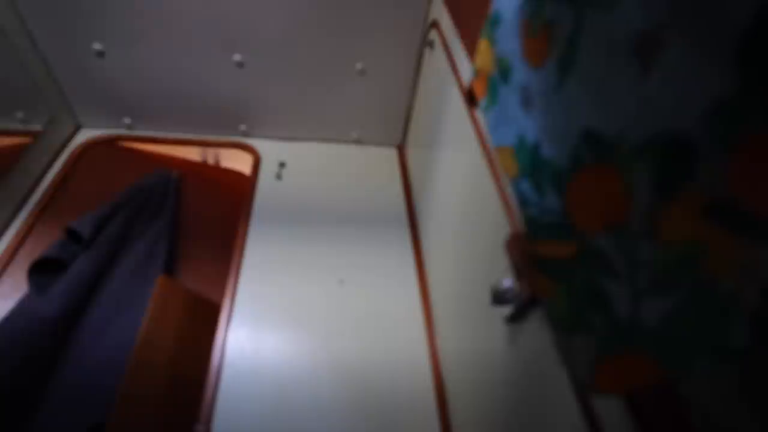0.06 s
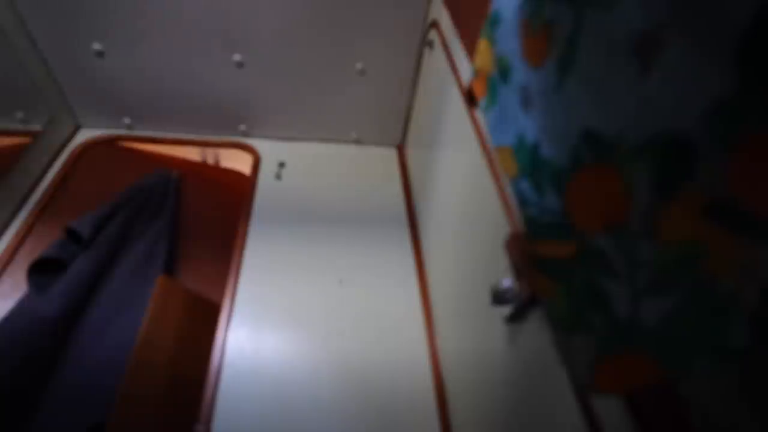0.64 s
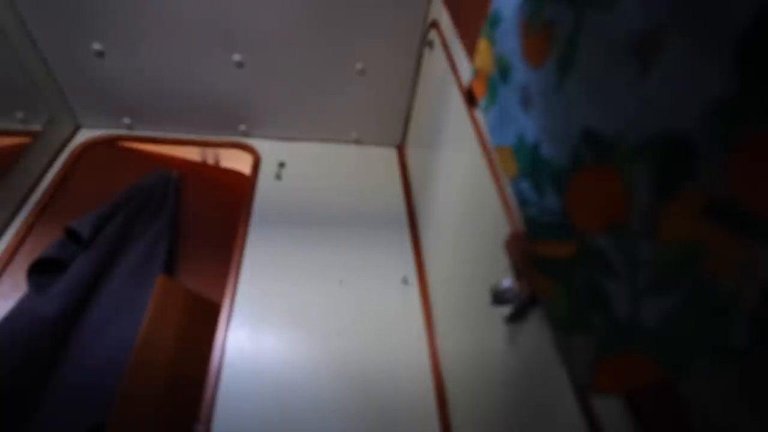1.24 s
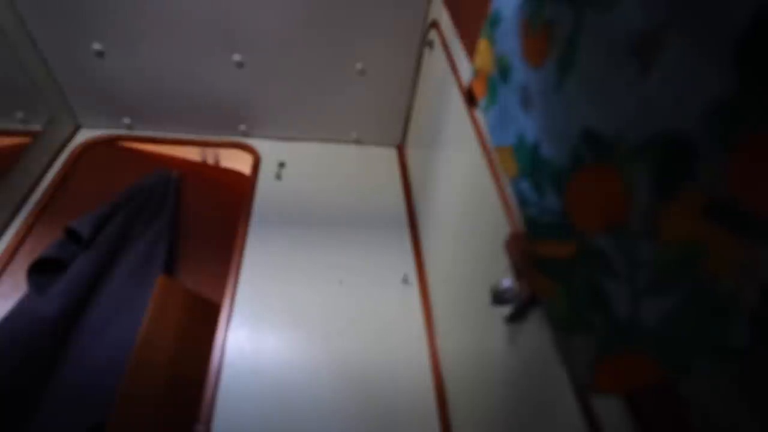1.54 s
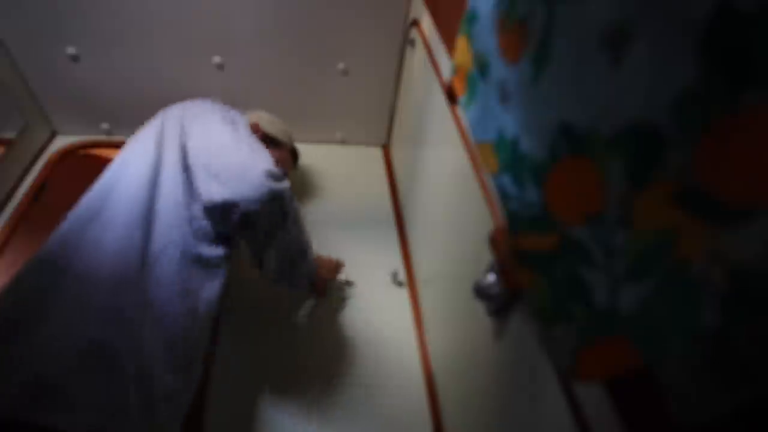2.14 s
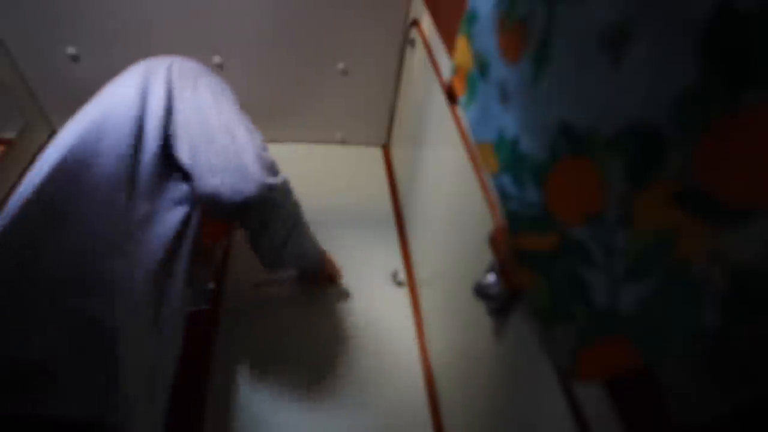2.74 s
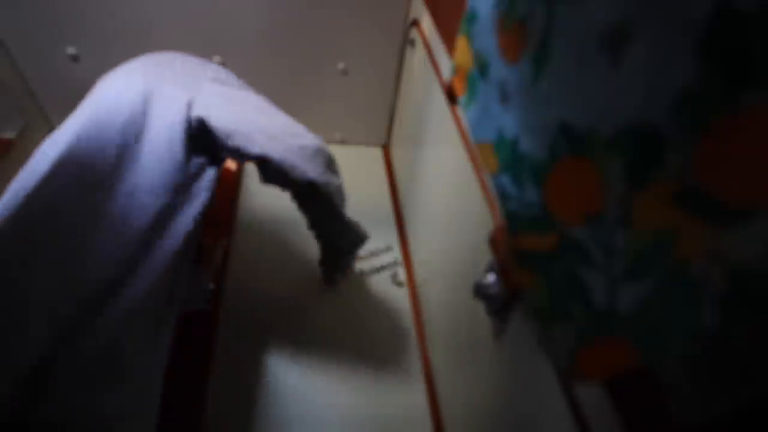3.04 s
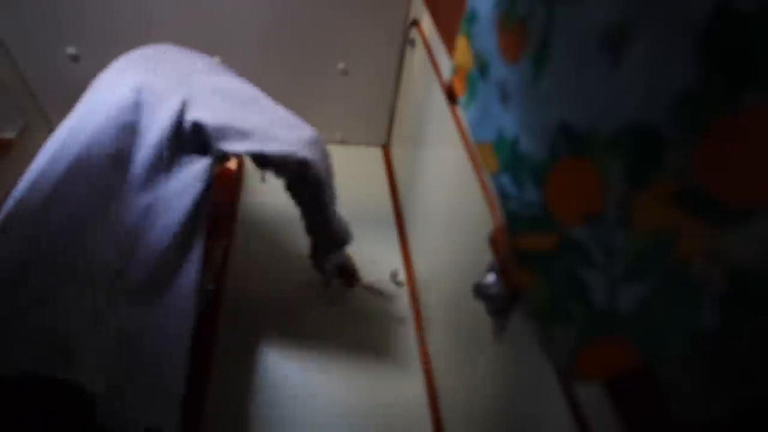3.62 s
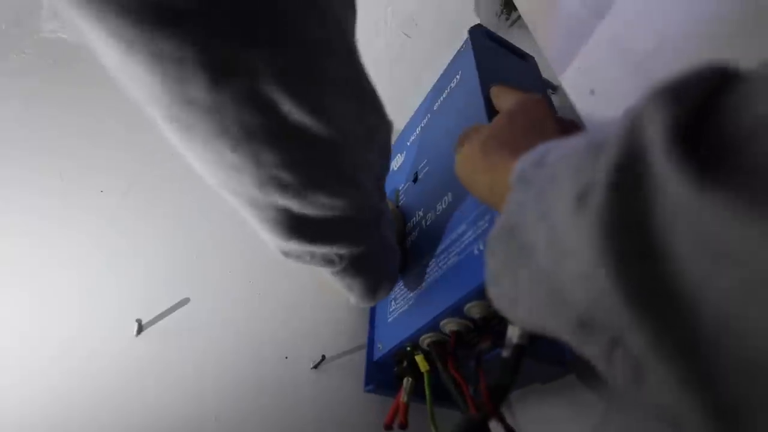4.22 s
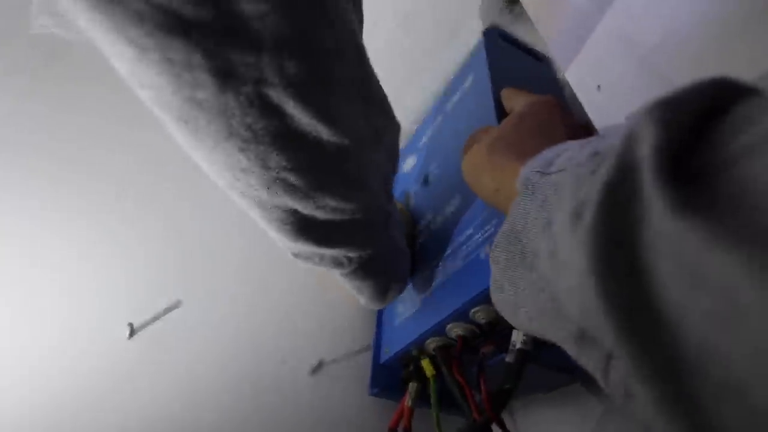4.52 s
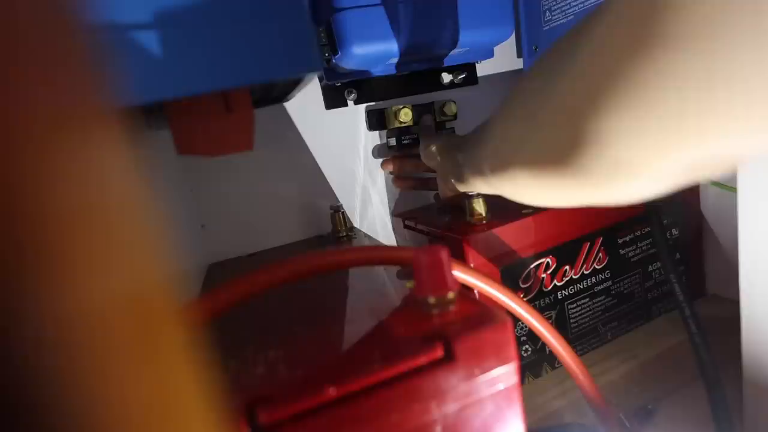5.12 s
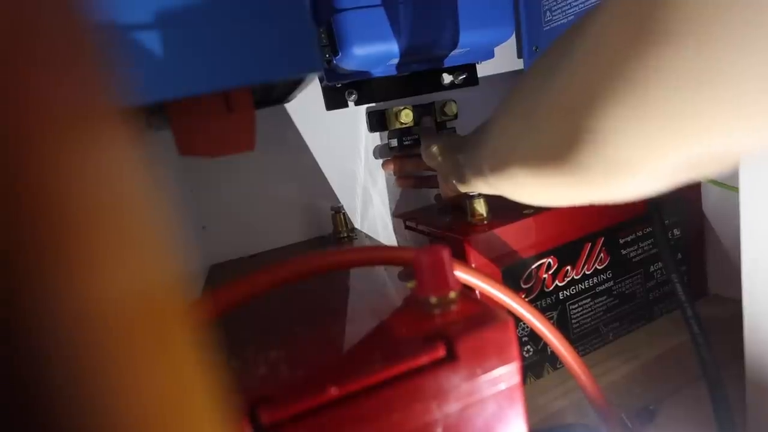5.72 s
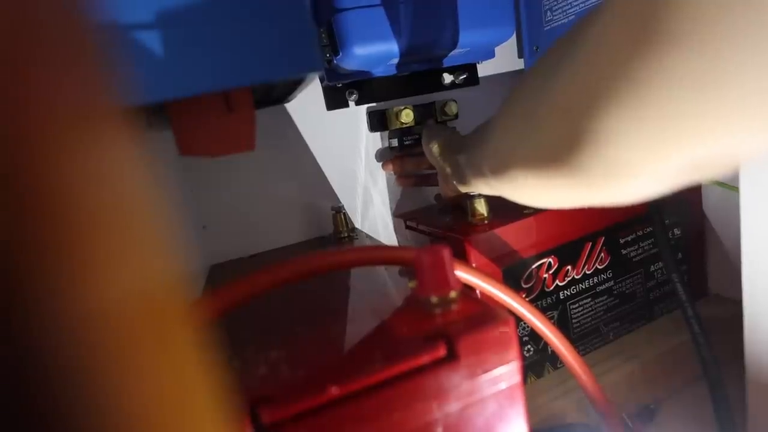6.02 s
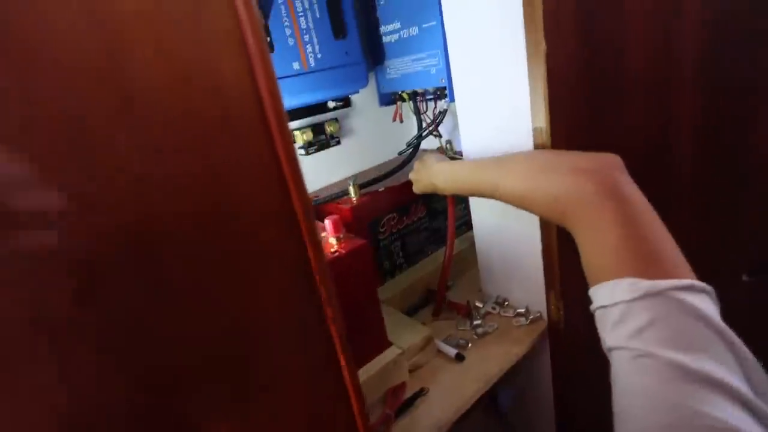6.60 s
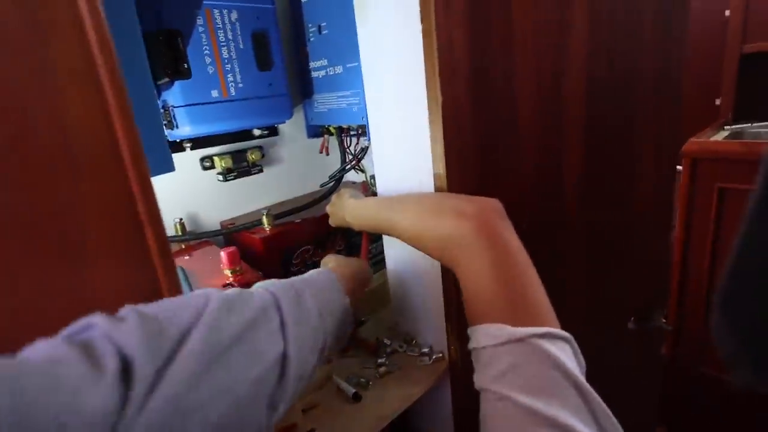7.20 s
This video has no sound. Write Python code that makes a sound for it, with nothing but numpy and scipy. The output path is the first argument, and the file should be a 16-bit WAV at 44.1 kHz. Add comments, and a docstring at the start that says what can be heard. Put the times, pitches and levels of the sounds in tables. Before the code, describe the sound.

Close to the microphone in a cramped wooden boat cupboard, a drill bores into a panel, crackling as it catches and whining higher afterwards. After an abrupt stop come sharp knocks on the wall and three short scrapes of bolt threads. Next a metal case clunks into place with low booms and tiny pings, then hands thump dully on wood while a spanner ticks faintly. Cloth rustle and low rumble underlie the handling.

```python
"""Fitting a battery charger in a boat's plywood cupboard, in four short scenes joined by hard cuts.
First a cordless drill whines and tears chips from the wall. From 2 s a bolt rasps in and out of the
hole, its threads catching on the wood, between knocks that make the wall ring. From 4 s the metal case
is bumped into place and washers ping. Last, from about 5 s, hands thump the battery locker and fumble
with cables while a spanner ticks. Once the drill stops, sleeves rustle and wood rumbles under it all."""
import sys
import numpy as np
from scipy.fft import rfft, irfft, next_fast_len
from scipy.io import wavfile
from scipy.ndimage import map_coordinates

SR = 44100
rng = np.random.default_rng(int(sys.argv[2]) if len(sys.argv) > 2 else 0)


def unload_wav(signal):
    """Save mono or channel-first audio to the path in sys.argv[1] as 16-bit WAV at rate SR, clipped to [-1, 1]."""
    wavfile.write(
        sys.argv[1],
        SR,
        np.round(np.clip(np.atleast_2d(signal).T, -1, 1) * 32767).astype(np.int16),
    )


N = 324135
TIME = np.arange(N) / SR
AGE = TIME[:SR // 2]  # seconds since a blow began
DRILL_END, CASE_START, LOCKER_START = 1.974, 3.98, 5.152  # the cuts, in seconds
BIND_START, BIND_END = 0.5, 0.786  # the drill bit jams between these seconds

# Noise shapes: how strong a noise is from low to high. Each row: frequency in Hz, level in dB.
SHUDDER = [(25, -22), (50, -26), (80, -21), (125, -3), (190, -3), (300, 4), (430, -1), (650, -35),
           (1200, -52)]  # the wall shaking
THUD = [(150, 6), (230, 17.5), (400, 13.5), (560, 4), (750, -22.5)]  # the low part of a blow
CLACK = [(330, 3.5), (600, 7.5), (1200, 1), (2000, -9), (3200, -24), (6000, -50)]  # its middle part
TICK = [(1900, 6), (3200, 0.5), (5000, -3.5), (8000, -9), (11000, -20), (15700, -29)]  # its high part
GRIT = [(4000, -12), (6800, -6.5), (8500, -12.5), (10000, -16), (13000, -11.5), (15700, -40)]  # scraped steel
RUBBING = [(150, -1), (280, 1.5), (420, -0.5), (580, -1), (850, -8.5), (1300, -8.5), (2200, -22)]  # hands on wood


def drill():
    """The bit tears off tiny chips that shake the wall; the harder the push, the louder it gets."""
    # How hard the drill is pushed. Each row: time in seconds, push in dB.
    push = [(0, -5), (0.33, -1), (0.42, -3.5), (0.53, 2), (0.61, 8), (0.72, 11), (0.81, -6.5), (0.89, -3.5),
            (0.98, -8.5), (1.085, 4.5), (1.165, -8.5), (1.26, 2), (1.37, -4.5), (1.62, 0.5), (1.72, 3.5),
            (1.97, 2)]
    # Notes of the wall and its hard surface. Each row: pitch in Hz, width in Hz, level in dB.
    wall_notes = [(458.4, 5.4, 4), (531, 29, -5), (585.7, 10.8, 1), (635, 13, -5.5), (691, 5.7, 2),
                  (738, 8.7, -15), (835, 9.6, -4.5), (960, 7.3, -6.5), (1029.5, 10.5, -3.5),
                  (1150, 7.8, -3), (1277, 40, -18), (1354, 22, -6)]
    surface_notes = [(1686, 10.5, 6), (1998, 91, 1), (2236, 5.1, 8.5), (2597, 140, 0), (3018, 10, 4)]
    # Low, middle and high noise of the cut. Each row: frequency in Hz, level in dB.
    grinding_shape = [(330, -17), (460, -10), (650, -5.5), (1000, -5.5), (1450, -13.5), (1900, -31.5)]
    cutting_shape = [(1100, -17), (1520, 1), (1900, -5), (2350, -4.5), (2600, -3.5), (3400, -4.5),
                     (4400, -40)]
    hiss_shape = [(1800, -41), (3300, 0), (4500, 1.5), (6000, -2.5), (7500, -9), (8700, -10),
                  (10500, -19.5), (12500, -17.5), (15700, -23)]
    push_db = curves(push)[0] + 2.4 * wobble(22.14)
    jam_db = 4 * gate(BIND_START, BIND_END, 0.012)
    chips, dust = grains(rate=11000, spread_db=0), grains(rate=12000, spread_db=1)
    shudder = coloured(grains(rate=4000, spread_db=-0.5), SHUDDER)
    grinding = 0.73 * resonated(chips, wall_notes) + 0.5 * coloured(dust, grinding_shape)
    cutting = 0.61 * resonated(chips, surface_notes) + 0.62 * coloured(dust, cutting_shape)
    out = amp(-27 + 0.55 * push_db) * shudder
    out += amp(-23 + 0.94 * push_db) * grinding
    out += amp(-29 + 0.54 * push_db + jam_db) * cutting
    out += amp(-30.5 + 0.4 * push_db) * coloured(chips, hiss_shape)
    return (out + splinters() + motor_whine()) * gate(-1, DRILL_END, 0.003)


def splinters():
    """The bit snags and tears out a splinter, sending a crack through the wall."""
    # Each row: start in seconds, level in dB.
    snags = [(.496, -20), (.522, -21.5), (.588, -21), (.675, -15), (0.719, -35), (.738, -23)]
    out = np.zeros(N)
    for start, db in snags:
        body = 0.33 * boom(hz=163, t60=0.13, rise=0.004)
        add(out, start, amp(db) * (body + burst(CLACK, t60=0.1) + 0.52 * burst(TICK, t60=0.11)))
    return out


def motor_whine():
    """Motor and gears sing at multiples of the motor's speed, drop out in the jam and return higher."""
    # The motor speeds up past the hard spot. Each row: time in seconds, turns per second.
    speeds = [(0, 286.2), (.5, 291), (.86, 334.5), (1.05, 338.6), (1.42, 339.5), (1.6, 338.9),
              (1.97, 338.7)]
    # Each list has one entry per tone: speed multiple, dB when slow, dB when fast (before the swell).
    multiples = [1, 2, 2.52, 4, 6.8, 15, 16.7, 25, 30, 40]
    slow_levels = [-29.5, -30, -60, -44, -44, -43.5, -41.5, -45.5, -49, -55]
    fast_levels = [-29, -30, -35, -39, -52, -32, -49, -46, -56, -68]
    speed, = curves(speeds)
    turns = np.cumsum(speed * (1 + 0.0003 * wobble(20))) / SR
    swell_db = 7 * (np.minimum(TIME, DRILL_END) - 2.13)  # 7 dB a second as the bit sinks in
    slow = gate(-1, BIND_START, 0.047)
    fast = gate(0.88, DRILL_END + 1, 0.055) * amp(swell_db)
    out = np.zeros(N)
    for multiple, slow_db, fast_db in zip(multiples, slow_levels, fast_levels):
        waver = amp(1.6 * wobble(28))
        tone = np.sqrt(2) * np.sin(2 * np.pi * multiple * turns)
        out += (amp(slow_db) * slow + amp(fast_db) * fast) * waver * tone
    return out


def bolt():
    """Threads catch on the hole's edge and ring wood and steel; the wood grows louder as they grip."""
    # Notes of the wood, the hole's edge and the bolt. Each row: pitch in Hz, width in Hz, level in dB.
    wood_notes = [(185, 9.3, -10.5), (362, 31, -9), (455, 21, -2), (564.5, 21, 6), (745, 52, 4),
                  (860, 110, -36), (1082, 64, 1), (1164, 15, 10), (1260, 16, -13), (1440, 28, -39)]
    edge_notes = [(1655, 60, -3), (1968, 36, 1), (2475, 40, -6), (2815, 65, 0), (3250, 35, -7),
                  (3545, 45, -9), (3890, 110, -11), (4180, 55, -6), (4880, 140, -11), (5870, 35, -15),
                  (6380, 45, -16)]
    steel_notes = [(4135, 34, 2.5), (7700, 510, -9), (8400, 280, 5), (8450, 154, 3.5), (13520, 170, -7)]
    # Noise of the threads. Each row: frequency in Hz, level in dB.
    rasp_shape = [(300, -16), (700, 8), (1400, 3.5), (2200, -5), (2900, -0.5), (3400, -6.5), (4500, 0.5),
                  (6500, -39), (8000, -40)]
    # Each row: start and length in seconds, wood and steel levels in dB, seconds until the threads grip.
    strokes = [(2.145, 0.2, -20.5, -27.5, 0.14), (2.826, 0.26, -22, -26, 0.014),
               (3.531, 0.21, -16, -22.5, 0.12)]
    attack_s, release_db_per_s = 0.01, 510
    catches = grains(rate=10000, spread_db=4.5) * amp(1.2 * wobble(120))
    # The touching point moves, so each note of the wood swells and fades on its own.
    wood = unit(sum(amp(db + 4.2 * wobble(14)) * np.sqrt(width) * resonated(catches, [(hz, width, 0)])
                    for hz, width, db in wood_notes))
    rasp = 0.63 * resonated(catches, edge_notes)
    rasp += 0.75 * coloured(grains(rate=9200, spread_db=1), rasp_shape)
    steel = 0.96 * amp(1.86 * wobble(45)) * resonated(catches, steel_notes)
    steel += 0.54 * coloured(grains(rate=14000, spread_db=-2.5), GRIT)
    shudder = amp(-34) * coloured(rng.standard_normal(N), SHUDDER)
    out = np.zeros(N)
    for start, length, wood_db, steel_db, grip_s in strokes:
        age = np.maximum(TIME - start, 0)
        envelope = (1 - np.exp(-age / attack_s)) * amp(-release_db_per_s * np.maximum(age - length, 0))
        looseness = np.clip(1 - (age / grip_s) ** 2, 0, 1)
        grip_db = wood_db - 11 * looseness + 1.4 * wobble(38)
        ending = np.minimum(age / length, 1) ** 4  # rasp and steel fade late in the stroke
        hole = amp(grip_db) * (1.31 * wood + amp(-0.5 - 2 * ending) * rasp)
        out += envelope * (shudder + hole + amp(steel_db - 8.5 * ending) * steel)
    return out


def wall_knocks():
    """Bolt and hand strike the wall and make it ring; harder knocks are quicker and brighter."""
    # Each row: start in seconds, level in dB, weight behind the blow in dB, hardness from 0 to 1.
    knocks = [(2.041, -33.5, -8, .4), (2.07, -24, -5, .8), (2.098, -20.5, -11, 0), (2.135, -16, -9.5, 0.64),
              (2.41, -32, -16, 0.67), (2.44, -25.5, -6, 0.7), (2.454, -17.5, -10, .52),
              (2.502, -20.5, -16, 0.61), (2.774, -15.5, -13, 0.61), (2.808, -14.5, -1.5, 0.66),
              (2.843, -25, -9, .9), (3.114, -14.5, -7, 0.33), (3.144, -23, -12, .05),
              (3.393, -29.5, -20, 0.17), (3.481, -11.5, -13.5, 0.76), (3.518, -18.5, -0.5, 0.44),
              (3.794, -24.5, -23, 0.75), (3.811, -11.5, -22, 0.59)]
    # Notes of the wall and its hard surface. Each row: pitch in Hz, level in dB, fade time in seconds.
    wall_notes = [(295.2, -10, 0.27), (459.3, -0.5, 0.13), (574, 3, 0.16), (749, -6, 0.16),
                  (1100, -3.5, 0.15), (1189, 3, 0.076), (1390, -9.5, 0.18)]
    surface_notes = [(1730, 5, 0.12), (1960, 15, 0.12), (2230, -33, 0.087), (2430, -5, 0.13),
                     (3000, 4, 0.24), (3220, -2, 0.11)]
    # Noise of a sharp rap. Each row: frequency in Hz, level in dB.
    rap_shape = [(1000, -27), (1550, 21.5), (2300, 1), (3300, 12), (4500, -82)]
    soft_rise_s, hard_rise_s = 0.0045, 0.00089
    out = np.zeros(N)
    for start, db, weight_db, hardness in knocks:
        body = amp(weight_db) * boom(hz=166.5, t60=0.2, rise=0.0078)
        clack = 0.75 * ring(wall_notes, scatter_db=-1.5)
        clack += 0.5 * burst(CLACK, t60=0.12, tail=0.1, tail_t60=0.12)
        thud = 0.22 * burst(THUD, t60=0.3)
        rap = 0.45 * ring(surface_notes) + 0.65 * burst(rap_shape, t60=0.11, tail=0.12)
        tick = burst(TICK, t60=0.048, tail=1.0)
        bright = amp(-29.5 + 24.7 * hardness) * rap + amp(-34.5 + 31.2 * hardness) * tick
        rise = soft_rise_s * (hard_rise_s / soft_rise_s) ** hardness
        add(out, start, amp(db) * onset(rise) * (body + clack + thud + bright))
    return out


def case_bumps():
    """The metal case clacks brightly against the boards until the cut."""
    # Each row: start in seconds, level in dB, boom pitch in Hz, hardness in dB, clack fade in seconds.
    blows = [(4.058, -44, 106, 12, 0.1), (4.11, -37, 106, 2.5, 0.22), (4.2245, -43, 105, 18, .045),
             (4.286, -53, 135, 20, 0.072), (4.3536, -10, 134, -3.5, 0.021), (4.392, -16.5, 138, -8, 0.11),
             (4.496, -44.5, 148, 8, 0.18), (4.528, -25.5, 168, -0.5, 0.13), (4.558, -8, 132, -15.5, 0.031),
             (4.582, -51, 109, 23.5, 0.054), (4.702, -15, 107.7, -15, 0.23),
             (4.742, -13.5, 124, -12.5, 0.1), (4.841, -9, 142, -14, 0.021), (4.859, -28.5, 117, -2, 0.074),
             (4.957, -24.5, 94, -16, .17), (5.08, -24, 113, -17, 0.11), (5.095, -19.5, 117, -10.5, 0.11),
             (5.105, -10.5, 146.6, -14, 0.039), (5.122, -12, 122, -6.5, 0.014)]
    # Notes of the boards behind the case. Each row: pitch in Hz, level in dB, fade time in seconds.
    boards = [(222, 1, 0.18), (281, 3.5, 0.21), (356, 0.5, 0.18), (400, -3.5, 0.076), (455, -7, 0.11),
              (596, -16, 0.042)]
    return bumps(blows, boards, ring_db=-9.5, tick_db=-10, dull_hz=22300) * gate(-1, LOCKER_START, 0.004)


def locker_thumps():
    """Hands on the wooden battery locker make duller blows."""
    # Each row: start in seconds, level in dB, boom pitch in Hz, hardness in dB, clack fade in seconds.
    blows = [(5.209, -24, 90, -45, .08), (5.369, -38.5, 118, -4, 0.11), (5.499, -30.5, 128, -11, 0.083),
             (5.547, -23, 93, -30, .07), (5.589, -12, 62.6, -44, 0.16), (5.628, -19, 73, -38, 0.065),
             (5.665, -27.5, 132, -49, 0.76), (5.912, -24.5, 95, -17.5, 0.12), (5.925, -26.5, 62, -8, 0.043),
             (6.116, -20, 122, -18, 0.022), (6.786, -33, 118, 7, 0.13), (6.989, -12, 121, -13, 0.15),
             (7.175, -34.5, 206, -8.5, 0.015)]
    # Notes of the locker's boards. Each row: pitch in Hz, level in dB, fade time in seconds.
    boards = [(206, 2.5, 0.3), (265, 5, 0.33), (364, -3.5, 0.24), (511, 0.5, 0.11), (690, -13, 0.13)]
    return bumps(blows, boards, ring_db=-18, tick_db=-18, dull_hz=3800)


def bumps(blows, boards, ring_db, tick_db, dull_hz):
    """Each blow booms in the hollow cupboard and rings the boards; hard ones clack and tick more."""
    # Notes of the hollow and of the clack. Each row: pitch in Hz, level in dB, fade time in seconds.
    hollow_notes = [(80, -4, .6), (106.4, 18, 0.94), (141, -6, 0.25), (177, -1, 0.57), (293, -10, 0.22)]
    clack_notes = [(578, 14, 0.14), (744, -13, 0.13), (853, 9, 0.13), (1040, -20, 0.083), (1095, 18, 0.28),
                   (1240, 3, 0.073), (1485, -21, .07), (1706, -6, 0.031), (2170, -10, 0.05)]
    out = np.zeros(N)
    for start, db, boom_hz, hard_db, t60 in blows:
        body = boom(boom_hz, t60=0.032 + 0.77 * t60, rise=0.0042) + 0.24 * ring(hollow_notes)
        wood = 0.95 * unit_hit(ring(boards, scatter_db=-0.5) * fading(5 * t60))
        wood += 0.58 * burst(THUD, t60=1.7 * t60, tail=0.094)
        wood_db = 1 + 0.58 * min(hard_db, 0)
        clack = amp(ring_db) * unit_hit(ring(clack_notes, scatter_db=5) * fading(3 * t60))
        clack += burst(CLACK, t60=t60, tail=0.17)
        tick = amp(tick_db + 0.18 * hard_db) * burst(TICK, t60=0.9 * t60, tail=0.13, tail_t60=0.3)
        contact = filtered(clack + tick, lambda hz: 1 / (1 + 1j * hz / dull_hz) ** 2)  # less treble
        add(out, start, amp(db) * onset(0.0011) * (body + amp(wood_db) * wood + amp(hard_db) * contact))
    return out


def washer_pings():
    """Washers and nuts tick and ring briefly."""
    # Each row: start in seconds, pitch in Hz, level in dB, fade time in seconds.
    pings = [(2.458, 14250, -45, .13), (3.845, 14150, -49, 0.39), (4.745, 8850, -14, 0.054),
             (4.745, 9300, -25, .05), (4.745, 3240, -43.5, 0.37), (4.77, 6400, -47, 0.12),
             (4.966, 4830, -41, 0.053), (4.966, 7700, -54, 0.084)]
    out = np.zeros(N)
    for start, hz, db, t60 in pings:
        tick = 0.11 * burst([(0.88 * hz, -5), (hz, 0), (0.84 * hz, -3)], t60=t60 / 2)
        note = np.sin(2 * np.pi * hz * AGE)
        add(out, start, amp(db) * onset(0.0011) * fading(t60) * (note + tick))
    return out


def spanner():
    """A spanner touches a battery terminal; the hand holding it stops the ringing quickly."""
    # Each row: start in seconds, level in dB.
    touches = [(5.264, -40.5), (5.366, -43.5), (5.525, -42), (5.558, -42.5), (5.835, -49), (5.912, -40),
               (5.925, -38), (6.24, -42)]
    # Notes of the spanner. Each row: pitch in Hz, width in Hz, level in dB.
    steel_notes = [(3520, 460, 2.5), (3810, 160, -3), (5960, 600, -11), (8900, 1900, -11)]
    out = np.zeros(N)
    for start, db in touches:
        steel = unit_hit(resonated(rng.standard_normal(len(AGE)), steel_notes) * fading(0.03))
        scrape = burst(GRIT, t60=0.05, tail=0.18)
        add(out, start, amp(db) * onset(0.00069) * (0.7 * steel + 0.36 * scrape))
    return out


def squeak():
    """Metal slides on metal with a faint, scratchy, falling tone."""
    start, end = 5.39, 5.6
    pitch_hz = np.interp(TIME, [start, end], [5150, 4750])
    scratch = wobble(450)
    return amp(-51) * gate(start, end, 0.04) * scratch * np.sin(2 * np.pi * np.cumsum(pitch_hz) / SR)


def fumbling():
    """Fingers and cables make light, dull taps of uneven size at random moments."""
    taps_per_s = 14
    starts = CASE_START + np.cumsum(rng.exponential(size=120)) / taps_per_s
    out = np.zeros(N)
    for start, size in zip(starts, rng.standard_normal(120)):
        if start < N / SR:
            add(out, start, amp(-43.5 + 2.4 * size) * onset(0.002) * burst(RUBBING, t60=0.05, tail=0.08))
    return out


def handling():
    """Hands and sleeves brush over the wood; each place rumbles and rustles in its own way."""
    # The rumble of each place and the hiss of cloth. Each row: frequency in Hz, level in dB.
    wall_shape = [(40, -28), (90, -12), (130, -4), (168, 3.5), (210, -1), (300, -36)]
    cupboard_shape = [(25, -16), (55, -21), (78, 8.5), (103, -1), (135, 9.5), (168, -2.5), (215, -14),
                      (290, 7), (400, -56)]
    locker_shape = [(20, -8), (45, 1), (75, -1), (100, -13), (135, -8), (200, -17), (330, -29.5)]
    cloth_shape = [(1500, 10.5), (2500, 7), (5000, 3.5), (8500, 0.5), (10800, -6), (15700, -7)]
    # How loud the rumble is. Each row: time in seconds, level in dB.
    rumble_levels = [(2, -43.5), (3.5, -42.5), (4.3, -35), (4.62, -27.5), (5.06, -28), (5.31, -44),
                     (5.6, -30), (6, -44), (6.22, -28.5), (6.6, -38.5), (7.1, -34), (7.35, -35)]
    # Each row: middle and length in seconds, rubbing level in dB, cloth hiss level in dB.
    brushes = [(1.985, 0.053, -39, -60), (2.598, 0.097, -41, -56), (3.273, 0.12, -43.5, -53.5),
               (3.878, 0.2, -34, -48.5), (4.273, 0.14, -43, -45), (4.547, 0.35, -41, -67),
               (5.49, 0.21, -45, -51), (5.695, 0.17, -58, -44.5), (6.335, 0.11, -36, -51.5),
               (6.643, 0.56, -40.5, -58), (7.106, 0.046, -39, -64)]
    # Each row: start and end in seconds, rumble shape, steady rubbing and cloth hiss levels in dB.
    places = [(DRILL_END, CASE_START, wall_shape, (-46.5, -63)),
              (CASE_START, LOCKER_START, cupboard_shape, (-46, -58.5)),
              (LOCKER_START, N / SR + 1, locker_shape, (-49, -51))]
    rumble, power = np.zeros(N), np.zeros((2, N))  # power has one row for rubbing, one for cloth
    for start, end, shape, rustle_db in places:
        here = gate(start, end, 0.0075)
        rumble += here * coloured(rng.standard_normal(N), shape)
        power += np.outer(amp(rustle_db) ** 2, here)
    for middle, length, rubbing_db, cloth_db in brushes:
        swell = np.exp(-(2 * (TIME - middle) / length) ** 2)
        power += np.outer(amp([rubbing_db, cloth_db]) ** 2, swell)
    rubbing = amp(2.6 * wobble(25)) * coloured(grains(rate=4000, spread_db=0), RUBBING)
    cloth = coloured(rng.standard_normal(N), cloth_shape)
    rumble_db = curves(rumble_levels)[0] + 2 * wobble(15)
    return amp(rumble_db) * rumble + np.sqrt(power[0]) * rubbing + np.sqrt(power[1]) * cloth


def ring(notes, scatter_db=7.5):
    """Each blow rings the notes at new strengths; the hand's weight shifts their pitch a little."""
    shifts = 1 + 0.012 * rng.standard_normal(len(notes))
    out = np.zeros(len(AGE))
    for shift, (hz, db, t60) in zip(shifts, notes):
        strength = rng.choice([-1, 1]) * amp(db + scatter_db * rng.normal())
        out += strength * fading(min(t60, 0.5)) * np.sin(2 * np.pi * hz * shift * AGE)
    return unit_hit(out)


def burst(shape, t60, tail=0.28, tail_t60=0.21, dull_hz=4500):
    """The short noise of a touch, plus the cabin's duller echo of it."""
    noise = coloured(rng.standard_normal(len(AGE)), shape)
    echo = filtered(noise, lambda hz: 1 / (1 + (hz / dull_hz) ** 2))
    return unit_hit(noise * fading(t60) + tail * echo * fading(tail_t60))


def boom(hz, t60, rise):
    """A whole panel bends under a soft push and gives one low note."""
    return unit_hit(np.sin(2 * np.pi * hz * AGE) * fading(t60) * onset(rise))


def grains(rate, spread_db):
    """Tiny cracks of uneven size at random moments, about `rate` a second."""
    happens = rng.random(N) < rate / SR
    return unit(happens * rng.standard_normal(N) * amp(spread_db * rng.standard_normal(N)))


def resonated(x, notes):
    """Let x ring an object's notes; a narrower note rings longer."""
    def response(f):
        return sum((-1) ** k * amp(db) * 1j * f * width / (hz * hz - f * f + 1j * f * width)
                   for k, (hz, width, db) in enumerate(notes))
    return unit(filtered(x, response))


def coloured(x, shape):
    """Give x a noise shape, falling steeply beyond its first and last rows."""
    points_hz, db = np.transpose(shape)

    def response(hz):
        edges = np.minimum(hz / points_hz[0], 1) ** 4 / np.maximum(hz / points_hz[-1], 1) ** 4
        return edges * amp(np.interp(np.log(hz + 1), np.log(points_hz), db))
    return unit(filtered(x, response))


def filtered(x, response):
    """Turn each frequency in x up or down by response(frequency)."""
    size = next_fast_len(len(x) + 8192)
    return irfft(rfft(x, size) * response(np.fft.rfftfreq(size, 1 / SR)), size)[:len(x)]


def onset(rise):
    """The build-up of a blow; softer ones take longer."""
    return 1 - np.exp(-AGE / max(rise, 1e-4))


def fading(t60):
    """Die away by 60 dB in t60 seconds, the fade time."""
    return amp(-60 * AGE / max(t60, 1e-3))


def gate(start, end, fade):
    """1 between two times and 0 outside, with straight fades."""
    return np.clip(np.minimum(TIME - start, end - TIME) / fade + 0.5, 0, 1)


def wobble(rate):
    """A smooth curve through `rate` random points a second."""
    return map_coordinates(rng.standard_normal(int(N * rate / SR) + 4), [TIME * rate])


def curves(rows):
    """Join timed rows with straight lines, one curve for each column after the time."""
    times, *columns = np.transpose(rows)
    return [np.interp(TIME, times, column) for column in columns]


def amp(db):
    """Turn decibels into a number to multiply by."""
    return 10 ** (np.asarray(db) / 20)


def unit(x):
    """Scale to an average level (rms) of 1."""
    return x / np.sqrt(np.mean(x ** 2) + 1e-20)


def unit_hit(x):
    """Scale a blow to an average level of 1 over its first 30 ms."""
    return x / np.sqrt(np.mean(x[:SR * 3 // 100] ** 2) + 1e-20)


def add(track, start, sound):
    """Mix a sound into the track at `start` seconds."""
    part = track[max(round(start * SR), 0):][:len(sound)]
    part += sound[:len(part)]


def scene():
    """All the work, on one channel."""
    work = drill() + bolt() + wall_knocks() + case_bumps() + locker_thumps()
    return (work + washer_pings() + spanner() + squeak() + fumbling() + handling())[None]


def record(dry):
    """The loudest blows overload the microphone, which rounds their tops; the highest treble is cut."""
    top_hz = 15750
    squashed = dry[0] / (1 + np.abs(dry[0]) ** 8) ** (1 / 8)
    return filtered(squashed, lambda hz: hz < top_hz)[None]


dry = scene()
out = record(dry)
unload_wav(out)
```